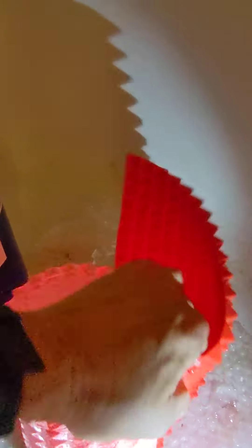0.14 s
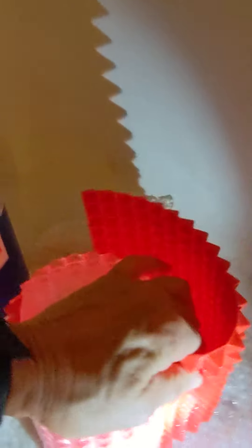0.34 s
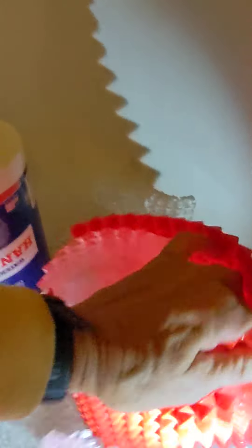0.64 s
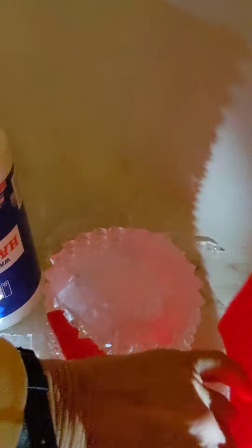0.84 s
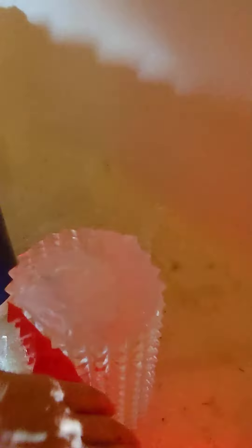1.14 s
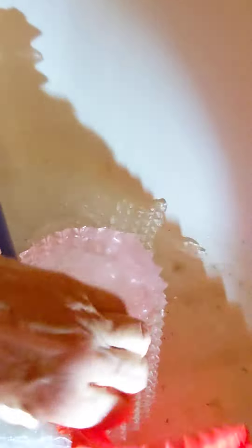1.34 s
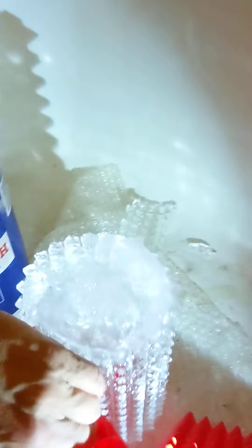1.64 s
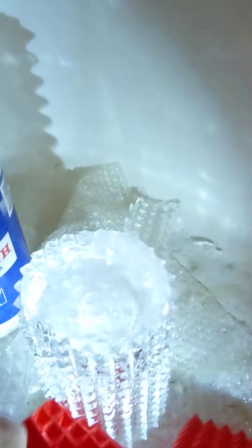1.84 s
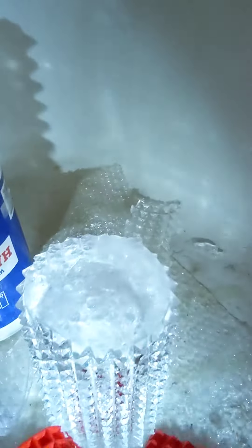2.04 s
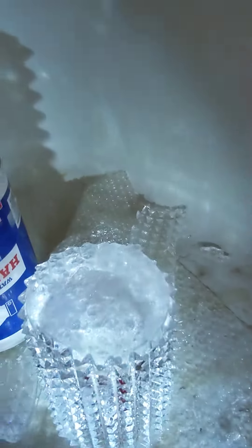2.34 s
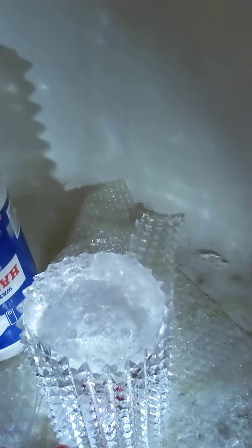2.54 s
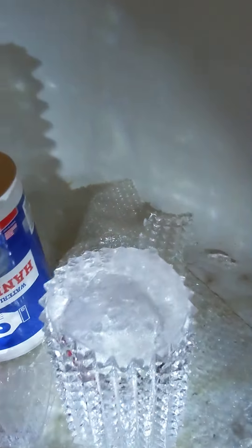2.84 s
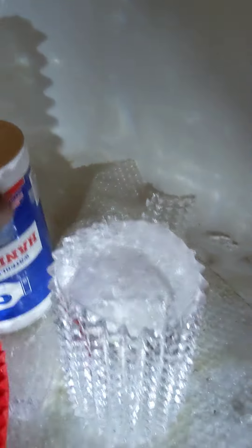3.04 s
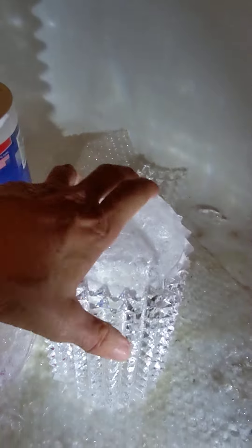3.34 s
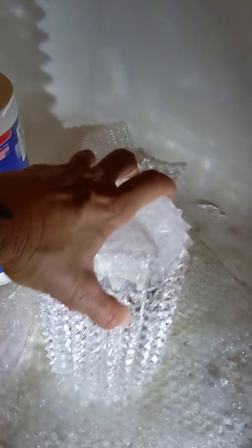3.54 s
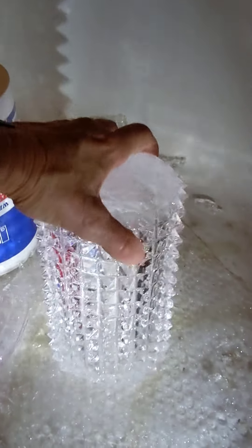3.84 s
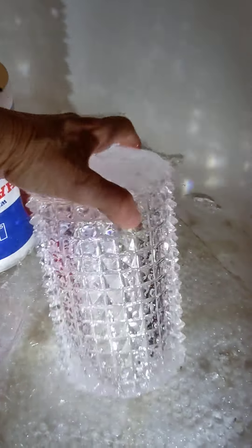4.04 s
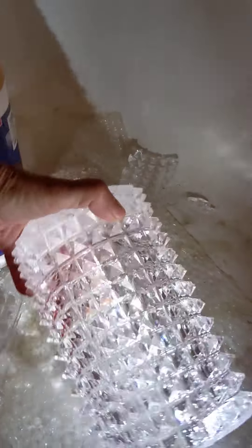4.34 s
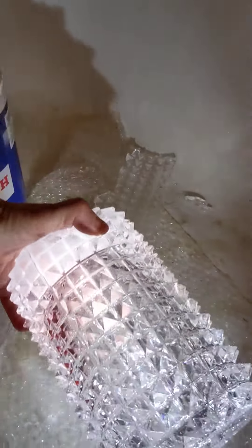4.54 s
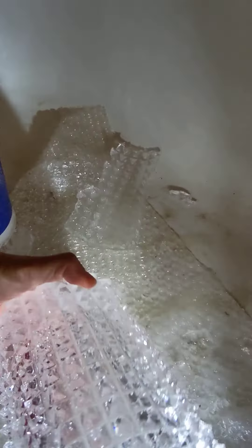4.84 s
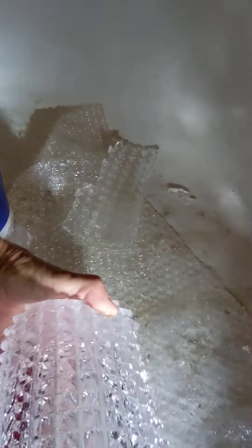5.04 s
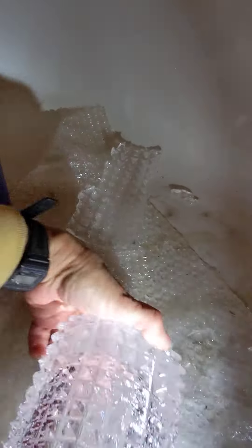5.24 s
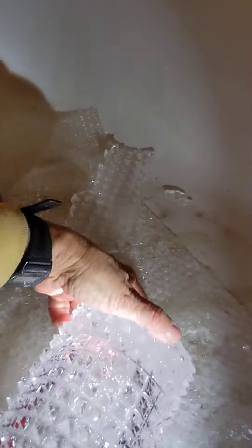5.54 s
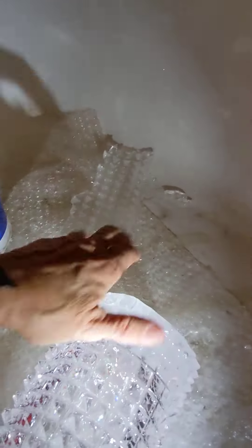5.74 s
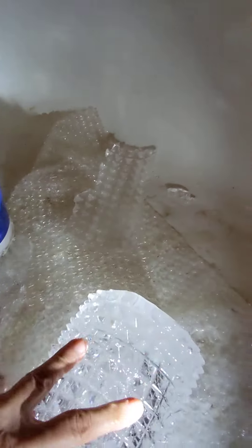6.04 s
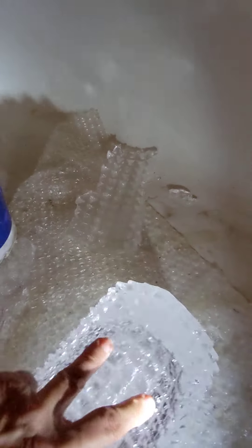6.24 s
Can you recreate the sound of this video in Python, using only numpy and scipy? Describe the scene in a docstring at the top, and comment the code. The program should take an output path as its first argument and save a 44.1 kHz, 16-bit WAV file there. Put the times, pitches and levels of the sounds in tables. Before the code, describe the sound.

Close up inside a small hard-walled freezer, a silicone mould is peeled from an ice block: dense crackling, sharp snaps, rubbery flaps and brief groans, with glassy ringing. The tearing stops after about three seconds. Fingertips tap the ice, it tips with faint ticks and rustling wrap, then lands and rolls with hollow bumps over a quiet rumble.

```python
"""A silicone mould is peeled off a tall block of ice that stands on bubble wrap in a chest freezer.
The mat crackles and snaps (showers of filtered clicks) and groans (wandering tones); the ice rings in its modes.
Then a hand tips the block and lays it down: it ticks, rustles the wrap and rolls with bumps on the hollow floor.
Noise echoes give the close hard walls, and shaped noise gives a quiet rumble."""
import sys
import numpy as np
from scipy import signal
from scipy.fft import rfft, irfft
from scipy.io import wavfile
from scipy.ndimage import uniform_filter1d

SR = 44100
rng = np.random.default_rng(int(sys.argv[2]) if len(sys.argv) > 2 else 0)


def digitize_waveform(pressure):
    """Quantize a signal to 16-bit integers and store it at the path in sys.argv[1].

    Rows of a 2-D input are taken as channels; values are limited to [-1, 1].
    """
    field = np.atleast_2d(pressure).T
    bounded = np.clip(field, -1, 1)
    quanta = np.round(bounded * 32767).astype(np.int16)
    wavfile.write(sys.argv[1], SR, quanta)


N = 281799
TIME = np.arange(N) / SR

# one stud or a whole row comes free: (t/s, snap level/dB, crack level/dB, release/s)
SNAPS = [(0.055, -30, -51, 0.0014), (0.3786, -28.5, -36.5, 0.0029), (0.3908, -25, -30, 0.0038),
         (0.5558, -34.5, -26.5, .002), (0.5908, -9.5, -10, 0.0021), (0.6762, -17.5, -30.5, .0025),
         (0.7500, -11, -24.5, 0.00094), (0.7688, -11.5, -9.5, 0.00067), (0.9005, -3, -19, .004),
         (0.912, -4, -27, 0.0027), (0.9200, -2.5, -17.5, .003), (1.0151, -24, -17, 0.0013),
         (1.0228, -13, -14.5, 0.00087), (1.0919, -25, -20, 0.0021), (1.1020, -19, -16.5, 0.0018),
         (1.135, -13.5, -21.5, .006), (1.149, -21, -21, 0.0011), (1.6398, -23.5, -19, 0.0025),
         (1.7752, -25, -26.5, 0.0018), (1.8137, -14, -17.5, .0035), (1.8322, -17.5, -27, 0.00076),
         (1.8485, -22.5, -22.5, .001), (1.8530, -4, -17.5, 0.0019), (1.909, -16.5, -10.5, 0.0019),
         (1.9335, -7.5, -18, 0.00092), (1.9738, -34, -27, 0.0002), (1.994, -21.5, -16.5, 0.0018),
         (2.0265, -17.5, -17.5, 0.0022), (2.0423, -23.5, -25.5, 0.00047), (2.0532, -25.5, -25.5, 0.00084),
         (2.0762, -14, -19, 0.0029), (2.0855, -17.5, -24, 0.0011), (2.0991, -17.5, -19, .001),
         (2.2212, -26.5, -28, .0005), (2.2415, -4.5, -17.5, .0016), (2.2701, -9, -26.5, 0.0021),
         (2.2813, -15, -26, 0.0012), (2.542, -44, -30, .001), (2.8632, -27, -29.5, 0.0017),
         (2.8907, -32, -20.5, 0.00095), (2.8952, -32.5, -20.5, 0.0021), (2.9168, -45, -19.5, 0.00039),
         (2.9239, -21, -21, 0.00098), (2.9536, -34, -20.5, 0.00075), (2.9737, -36, -22, 0.00072),
         (2.988, -33, -24, 0.00056), (3.0360, -25, -32, 0.00065), (3.0468, -21, -43, .002),
         (3.0610, -33, -44, 0.00067), (3.136, -30, -24.5, 0.0011), (3.1605, -30, -27.5, 0.00073),
         (3.1975, -28, -36, 0.0011), (3.3455, -59, -56, 0.0012)]
# the block rolls on its side: (t/s, push on the floor/dB)
ROLL = [(5.325, -30), (5.346, -30), (5.388, -36), (5.45, -27.5), (5.488, -22.5), (5.618, -24.5),
        (5.74, -35), (5.81, -53.5), (5.954, -56.5), (6.004, -58), (6.198, -44), (6.244, -35),
        (6.356, -43.5), (6.39, -34)]
# colour of the many small jumps of the mat: (f/Hz, level/dB)
CRACKLE_SPECTRUM = [(500, -21.5), (900, -3.5), (1200, -0.5), (1500, -4), (2300, 2.5), (3000, 0),
                    (3600, -7.5), (4700, -2.5), (5700, -17), (8000, -29.5)]
# colour of bright, sharp cracks: (f/Hz, level/dB)
CRACK_SPECTRUM = [(3000, -17), (4700, 4), (5900, -6), (7100, 0), (7900, -1), (9300, -3), (12000, -3),
                  (16000, -6)]
# colour of flexing rubber and of the crushed cushion: (f/Hz, level/dB)
FLEX_SPECTRUM = [(60, -17.5), (110, 2), (180, -15.5), (270, -16), (360, -7.5), (450, -8.5), (800, -11.5),
                 (1500, -17.5)]
# colour of rustling film and of ticking studs: (f/Hz, level/dB)
RUSTLE_SPECTRUM = [(400, -5.5), (1200, -1), (2900, 1.5), (4600, -0.5), (6000, -6), (10000, -6),
                   (16000, -10)]
PULL_ATTACK_S, PULL_RELEASE_DB_PER_S = 0.025, 296.5
SLAP_RELEASE_S = 0.007


def from_db(db):
    """Turn decibels into a gain."""
    return 10 ** (np.asarray(db) / 20)


def rms_one(x):
    """Scale a signal to an rms of 1."""
    return x / np.sqrt(np.mean(x ** 2) + 1e-20)


def at_hz(points, hz):
    """Read a table between its points, on a log-frequency axis."""
    f, value = np.transpose(points)
    return np.interp(np.log(hz), np.log(f), value)


def add(track, s, sound):
    """Mix a sound into a track at a time in seconds."""
    i = int(s * SR)
    track[i:i + len(sound)] += sound[:N - i]


def convolve(x, response):
    """Pass a signal through an impulse response."""
    return signal.fftconvolve(x, response, axes=-1)[..., :N]


def colour(x, spectrum, size=4096):
    """Filter to a spectrum, with unit energy and no pre-echo; it falls steeply past the table's ends."""
    hz = np.maximum(np.arange(size // 2 + 1) * SR / size, 1)
    octaves_outside = np.abs(np.log2(hz / np.clip(hz, spectrum[0][0], spectrum[-1][0])))
    gain = from_db(at_hz(spectrum, hz) - 20 * octaves_outside)
    # keeping one half of the cepstrum makes the filter respond as early as it can
    cepstrum = irfft(np.log(gain))
    response = irfft(np.exp(rfft(2 * cepstrum[:size // 2], size)))
    return convolve(x, response / np.linalg.norm(response))


def drift(per_s):
    """Wander slowly by chance, with an rms of 1; straight lines join so many random points per second."""
    knots = rng.standard_normal(4000)
    return rms_one(np.interp(TIME * per_s, np.arange(len(knots)), knots))


def stroke(start_s, length_s, attack_s, release_db_per_s, sag_db=0):
    """Gain of one movement: it rises, holds while sagging, and dies away."""
    age = TIME - start_s
    sag = sag_db * np.clip(age / length_s, 0, 1)
    release = release_db_per_s * np.maximum(age - length_s, 0)
    return np.clip(age / attack_s, 0, 1) * from_db(-sag - release)


def grains(per_s, spread_db, clump_db):
    """Tiny clicks of uneven size that come in clumps; the level is evened over 50 ms."""
    sizes = from_db(spread_db * np.minimum(rng.exponential(1, N), 4) + clump_db * drift(170))
    happens = rng.random(N) < per_s / SR
    clicks = sizes * rng.choice([-1, 1], N) * happens
    power = np.abs(uniform_filter1d(clicks ** 2, SR // 20))
    return clicks / np.sqrt(power + 1e-9)


def burst(release_s, size=1500):
    """One sharp break and a dying run of micro-clicks, with the energy of 10 ms at rms 1."""
    age = TIME[:size] / max(release_s, 1e-4)
    sizes = from_db(4.3 * np.clip(rng.standard_normal(size), -2, 2))
    run = rng.standard_normal(size) * sizes * np.sqrt(age) * np.exp(-2 * age)
    clicks = run / np.linalg.norm(run)
    clicks[np.argmin(np.abs(age - 0.5))] += rng.choice([-1, 1])   # the break
    return clicks / np.linalg.norm(clicks) * np.sqrt(SR / 100)


def push(contact_s):
    """Force of one cushioned contact, of unit impulse: it swells and dies, slower for a softer contact."""
    age = TIME[:SR // 20] / max(contact_s, 1e-4)
    force = age * np.exp(-5 * age)
    return force / force.sum()


def ring(force, hz, t60):
    """A resonance: a unit click sets a sine of starting height 1 ringing, 60 dB down after t60 seconds."""
    radius, angle = from_db(-60 / (t60 * SR)), 2 * np.pi * hz / SR
    feedback = [1, -2 * radius * np.cos(angle), radius * radius]
    return signal.lfilter([0, np.sin(angle)], feedback, force + 1e-18)


def strike(times, levels_db, modes):
    """Sharp blows set all modes of the ice ringing; every second mode starts downwards."""
    force = np.zeros(N)
    force[(times * SR).astype(int)] = from_db(levels_db)
    return sum(from_db(db) * ring(force, hz, t60) * (-1) ** k for k, (hz, db, t60) in enumerate(modes))


def groan(hz, wander_octaves=0.18):
    """A resonance of the stretched sheet wanders in pitch as the tension changes."""
    pitch = hz * 2 ** (wander_octaves * drift(24))
    return rms_one(drift(45) * np.sin(2 * np.pi * np.cumsum(pitch) / SR))


def diffuse_bands(size):
    """Half-octave bands of stereo noise whose left and right sides are alike by a share set per pitch."""
    # how alike left and right are: (f/Hz, likeness from 0 to 1)
    likeness = [(30, .4), (80, 1), (350, 0.14), (700, 0.76), (1200, 0.2), (2400, 0.06), (16000, 0.2)]
    edges = 22 * 2 ** (np.arange(20) / 2)
    white = rng.standard_normal((2, 2, size))
    for k, (low, high) in enumerate(zip(edges, edges[1:])):
        band = signal.butter(2, [low, high], "band", fs=SR, output="sos")
        mid, side = signal.sosfilt(band, white[k % 2])
        hz = np.sqrt(low * high)
        alike = np.clip(at_hz(likeness, hz), -1, 1)
        stereo = np.sqrt(1 + alike) * mid + np.sqrt(1 - alike) * side * [[1], [-1]]
        yield hz, stereo / np.sqrt(2)


def rumble():
    """A quiet rumble throughout: steady noise, strongest in the bass."""
    # colour of the rumble: (f/Hz, level/dB)
    spectrum = [(25, 1), (45, -6), (80, -0.5), (125, -22.5), (220, -21), (600, -33.5), (3000, -32.5),
                (7000, -38.5), (16000, -42.5)]
    noise_bands = diffuse_bands(N)
    return from_db(-57.5) * rms_one(sum(from_db(at_hz(spectrum, hz)) * noise for hz, noise in noise_bands))


def peeling():
    """Silicone tears loose from the ice in countless tiny jumps while the sheet flexes."""
    # each pull: (start t/s, length/s, crackle level/dB, slackening over the pull/dB,
    # fizz level against crackle/dB, flexing level/dB)
    pulls = [(-0.01, 0.14, -47, 14, 1, -62), (0.16, 0.85, -54.5, -3.5, -2, -65.5),
             (0.615, 0.76, -39.5, 10, 0, -48), (0.87, 0.35, -39, -1.5, -6.5, -54),
             (1.288, 0.21, -54.5, -7.5, -11.5, -51), (1.488, 0.24, -51.5, -6, -3.5, -55.5),
             (1.615, 0.11, -43, 0.5, 0, -48), (1.811, 0.12, -33.5, 4, 3.5, -39),
             (1.977, 0.7, -33, 9.5, -1, -45.5), (2.283, 0.64, -33, 14, 1, -43.5),
             (2.864, 0.12, -34, 2, 5, -42), (3.038, 0.14, -34, 8.5, -4.5, -42.5),
             (3.099, 0.19, -37.5, 10.5, 2, -46.5)]
    fizz_slackens, flex_slackens = 1.6, 0.23   # shares of the crackle's slackening in dB
    full_rip_db = 3.5   # fizz level near which a pull is a fast rip, whose jumps run together
    crackle, fizz, rip, flex = np.zeros((4, N))
    for s, length_s, db, sag_db, fizz_db, flex_db in pulls:
        pull = s, length_s, PULL_ATTACK_S, PULL_RELEASE_DB_PER_S
        bright = from_db(db + fizz_db) * stroke(*pull, fizz_slackens * sag_db)
        fast = np.clip(fizz_db / full_rip_db, 0, 0.9)
        # where pulls overlap, the louder one counts
        crackle = np.maximum(crackle, from_db(db) * stroke(*pull, sag_db))
        fizz = np.maximum(fizz, np.sqrt(1 - fast) * bright)
        rip = np.maximum(rip, np.sqrt(fast) * bright)
        flex = np.maximum(flex, from_db(flex_db) * stroke(*pull, flex_slackens * sag_db))
    jumps = grains(per_s=1100, spread_db=5.0, clump_db=4.0)
    run = grains(per_s=11000, spread_db=5.0, clump_db=6.5)
    rubber = grains(per_s=550, spread_db=7.0, clump_db=1.5)
    sheet = from_db(-4.0) * colour(rubber * flex, FLEX_SPECTRUM)
    sheet += from_db(-11.0) * flex * (groan(205) + groan(335))
    dull = from_db(-6.5) * colour(jumps * crackle, CRACKLE_SPECTRUM)
    sharp = from_db(-2.5) * colour(jumps * fizz + run * rip, CRACK_SPECTRUM)
    return dull + sharp + sheet


def snaps():
    """Studs come free with a snap, a bright crack and a flap of the sheet, which also slaps on its own."""
    # the loose sheet slaps: (t/s, level/dB)
    slaps = [(0.0572, -36.5), (0.385, -31), (0.775, -28), (0.922, -19.5), (0.948, -24), (1.1361, -31),
             (1.222, -42), (1.2893, -27), (1.39, -38.5), (1.4663, -37.5), (2.028, -27)]
    # colour of the flapping sheet: (f/Hz, level/dB)
    flap_spectrum = [(100, -13), (220, -14.5), (340, 2), (430, -6), (560, 3.5), (800, -9), (1200, -4),
                     (2000, -34.5)]
    flap, snap, crack = np.zeros((3, N))
    for s, db, crack_db, release_s in SNAPS:
        add(snap, s, from_db(db) * burst(release_s))
        add(crack, s, from_db(crack_db) * burst(release_s))
        add(flap, s, from_db(db - 24.5) * burst(SLAP_RELEASE_S))   # a little flap with every snap
    for s, db in slaps:
        add(flap, s, from_db(db) * burst(SLAP_RELEASE_S))
    snapping = from_db(-14.5) * colour(snap, CRACKLE_SPECTRUM)
    cracking = from_db(-8.5) * colour(crack, CRACK_SPECTRUM)
    return snapping + cracking + from_db(-3.0) * colour(flap, flap_spectrum)


def plucked_ice():
    """Every snap also sets the standing block ringing; the mat damps the ice less as it comes off."""
    # modes of the standing block: (f/Hz, level/dB, t60/s)
    upright_modes = [(1174, -5, .13), (1800, -11, .12), (2172, 6, .15), (2482, -4, .11), (2750, -1, .13),
                     (3133, -7, .12), (4115, -3, .12), (4420, -4, .13), (4815, 1, .15), (7125, -6, .14)]
    covered_db, bare_db, bare_at_s = -38, -20.5, 1.7   # ring level against the snap
    s, db = np.transpose(SNAPS)[:2]
    freedom_db = np.interp(s, [0, bare_at_s], [covered_db, bare_db])
    return strike(s, db + freedom_db, upright_modes)


def roll_push():
    """Gain of the rolling block's push on the floor; all but silent until it is laid down."""
    s, db = np.transpose(ROLL)
    return from_db(np.interp(TIME, s, db, left=-120))


def rolling_studs():
    """One stud after another meets the floor, at an uneven pace and with uneven softness."""
    studs_per_s, jitter, contact_s = 42, 0.247, 0.0047   # jitter as a share of the gap between studs
    force = np.zeros(N)
    times = np.arange(ROLL[0][0], ROLL[-1][0], 1 / studs_per_s)
    for s, (late, softness) in zip(times, rng.standard_normal((100, 2))):
        landing_s = min(s + jitter * late / studs_per_s, TIME[-1])
        add(force, landing_s, push(contact_s * 2 ** (0.31 * softness)))
    return from_db(6.5) * roll_push() * force


def floor_bumps():
    """Weight pushes on the hollow floor through the cushion; shorter pushes sound brighter."""
    # weight lands on the floor: (t/s, level/dB, contact time/s)
    bumps = [(0.395, -27, 0.012), (0.595, -23, 0.017), (0.914, -23, 0.00067), (3.271, -34.5, 0.0046),
             (3.712, -21, 0.015), (5.343, -29.5, 0.00018), (5.376, -15, 0.0046), (5.403, -18, 0.0083),
             (5.484, -13.5, 0.0037), (5.496, -17, 0.0055), (5.534, -9, 0.023), (5.599, -13.5, 0.0052),
             (5.621, -21, 0.0068), (5.675, -24, 0.0052), (5.724, -26.5, 0.0051), (5.754, -33.5, 0.0033),
             (6.007, -38, 0.0032), (6.380, -24, 0.0022)]
    # modes of the freezer floor: (f/Hz, level/dB, t60/s)
    floor_modes = [(79.4, -14.5, 0.4), (100, -4.5, 0.17), (154.3, -4.5, 0.4), (187, -7.5, 0.1),
                   (240, -4.5, 0.25), (286.7, -7.5, 0.35), (354, -9.5, 0.14), (430, -2.5, 0.14),
                   (497, -8, 0.3), (720, -3.5, 0.1)]
    force = rolling_studs()
    for s, db, contact_s in bumps:
        add(force, s, from_db(db) * push(contact_s))
    boom = np.zeros(N)
    for k, (hz, db, t60) in enumerate(floor_modes):
        # the point of contact moves, so each mode takes a changing share
        share = from_db(db - 2.0 + 2.5 * drift(50))
        boom += ring(force * share, hz, t60) * (-1) ** k
    # the cushion is crushed for a moment (12 ms decay) after each push, with a dull mutter
    crush = signal.lfilter([1], [1, -np.exp(-1 / (0.012 * SR))], force) * rng.standard_normal(N)
    dull = signal.butter(2, 260, fs=SR, output="sos")
    mutter = signal.sosfilt(dull, colour(crush, FLEX_SPECTRUM))
    no_deep_bass = signal.butter(5, 68, "high", fs=SR, output="sos")
    return signal.sosfilt(no_deep_bass, boom + from_db(-12.5) * mutter)


def straining():
    """The taut sheet groans higher and more steadily before it gives way."""
    # groans: (start t/s, length/s, level/dB)
    strains = [(0.688, 0.045, -41), (0.849, 0.13, -43)]
    tension = np.zeros(N)
    for s, length_s, db in strains:
        tension += from_db(db) * stroke(s, length_s, PULL_ATTACK_S, PULL_RELEASE_DB_PER_S)
    return tension * groan(553, wander_octaves=0.061)


def ice_blows():
    """Clean glassy knocks, then rough rings as studs skid and roll; a harder touch brings out overtones."""
    # the block knocks as it rocks: (t/s, level/dB, contact time/s)
    knocks = [(0.751, -17.5, 0.00022), (0.7698, -14.5, 0.000075), (0.784, -15, 0.0015)]
    # the handled block skids on its studs: (t/s, ring level/dB, overtones against ring/dB, skid time/s)
    taps = [(3.682, -48, 12.5, .0012), (3.701, -42, -7, .003), (3.905, -65, 10, 0.0038),
            (4.009, -65, 7, .002), (4.056, -54, 6, .003), (4.079, -51.5, 12.5, .003),
            (4.138, -52, 15.5, .006), (5.498, -19.5, -14, 0.013), (5.522, -21.5, -19, 0.0088),
            (5.647, -35.5, -28, 0.024), (6.007, -50, -14, 0.0085), (6.107, -53, -14.5, 0.0099),
            (6.261, -37.5, -14, 0.0023)]
    # modes of the knocked block: (f/Hz, level/dB, t60/s)
    knock_modes = [(1430, -11, .1), (1561, -1, .16), (2428, 3, .11), (3760, -1, .14)]
    # modes of the tipped block: (f/Hz, level/dB, t60/s)
    tipped_modes = [(1507, -2, .1), (1575, -6, .07), (2875, -3, .08), (4091, -15, .04), (4700, -11, .04),
                    (6971, -22, .04)]
    knock, soft, hard = np.zeros((3, N))
    for s, db, contact_s in knocks:
        add(knock, s, from_db(db) * push(contact_s))
    for s, db, overtones_db, skid_s in taps:
        skid = burst(skid_s, size=4000)
        skid *= from_db(db) / np.linalg.norm(skid)
        add(soft, s, skid)
        add(hard, s, skid * from_db(overtones_db))
    # the ice also skids under the rolling weight
    soft += from_db(-56.5) * roll_push() * grains(per_s=470, spread_db=-1, clump_db=1)
    rings = sum(from_db(db) * ring(knock, hz, t60) for hz, db, t60 in knock_modes)
    for k, (hz, db, t60) in enumerate(tipped_modes):
        force = soft if k < 2 else hard   # the two lowest modes, then the overtones
        rings += from_db(db) * ring(force, hz, t60)
    tick = from_db(6.5) * colour(hard, RUSTLE_SPECTRUM)   # the contact itself
    return rings + tick


def grip():
    """Fingertips land on the block with short knocks, damped by the hand."""
    # fingertips land: (t/s, level/dB)
    grips = [(3.2668, -22.5), (3.312, -44)]
    # modes under the hand: (f/Hz, level/dB, t60/s)
    grip_modes = [(850, -7, .008), (1336, 0, .011), (2525, -8, .014)]
    return strike(*np.transpose(grips), grip_modes)


def bubble_wrap():
    """The film rustles under the moving weight and now and then crinkles sharply."""
    # the tilting block shifts on the wrap: (start t/s, length/s, level/dB)
    shifts = [(3.655, 0.16, -59), (4.051, 0.2, -58.5), (5.036, 0.33, -56.5)]
    # the wrap crinkles: (t/s, level/dB, crack against that/dB)
    crinkles = [(3.46, -56, 4), (4.200, -56.5, 3.5), (5.07, -69, 18.5), (5.155, -52.5, -25),
                (5.34, -41, -0.5), (5.477, -32, -19), (5.519, -33, -22), (5.572, -60, -1),
                (6.009, -50.5, -6), (6.261, -47, 11)]
    load = from_db(-14.5) * roll_push()
    for s, length_s, db in shifts:
        load += from_db(db) * stroke(s, length_s, attack_s=0.012, release_db_per_s=216)
    film = from_db(-5.0) * load * grains(per_s=610, spread_db=-0.5, clump_db=6.5)
    crack = np.zeros(N)
    for s, db, crack_db in crinkles:
        fold = from_db(db) * burst(release_s=0.0051)
        add(film, s, fold)
        add(crack, s, fold * from_db(crack_db))
    return colour(film, RUSTLE_SPECTRUM) + colour(crack, CRACK_SPECTRUM)


def walls(tail_db):
    """Echoes from one spot: close walls scatter the sound, then a longer tail builds up and dies."""
    # how long the tail lasts: (f/Hz, t60/s)
    tail_t60 = [(200, 0.056), (550, 0.17), (1400, 0.14), (3700, 0.097), (10000, 0.099), (16000, 0.047)]
    early_db, early_t60 = -6, 0.007   # scatter from the nearest walls; t60 in seconds
    age = TIME[:SR // 3]
    early_onset = age > 0.0008
    tail_onset = 1 - np.exp(-(age / 0.005) ** 2)   # the far walls answer after a short gap
    response = np.zeros((2, len(age)))
    for hz, noise in diffuse_bands(len(age)):
        early = early_db, early_t60, early_onset
        tail = tail_db, at_hz(tail_t60, hz), tail_onset
        for db, t60, onset in (early, tail):
            fade = np.exp(-np.log(1000) * age / t60) * onset
            response += from_db(db) * noise * fade / np.linalg.norm(fade)
    return response


def direct(x):
    """Sound from the left reaches the right side 13 samples later."""
    return np.array([x, np.pad(x, (13, 0))[:N]])


def freezer(x, tail_db):
    """Direct sound plus echoes that change as the source moves between three spots."""
    shares = np.array([drift(40) for spot in range(3)])
    shares /= np.linalg.norm(shares, axis=0)
    echoes = sum(convolve(x[None] * share, walls(tail_db)) for share in shares)
    return direct(x) + echoes


def scene():
    """All sources inside the freezer, over a quiet rumble; the floor is heard without echoes."""
    crackling = freezer(peeling() + straining() + snaps() + bubble_wrap(), tail_db=0.36)
    ice = from_db(-2) * freezer(ice_blows() + plucked_ice() + grip(), tail_db=0.0)
    return crackling + ice + direct(floor_bumps()) + rumble()


def record(dry):
    """The right side is duller around 13 kHz; peaks stop at full scale and all above 16 kHz is cut."""
    b, a = signal.iirpeak(13000, 2, fs=SR)
    right = dry[1] - 0.42 * signal.lfilter(b, a, dry[1])
    stereo = np.clip([dry[0], from_db(0.6) * right], -1, 1)
    top_cut = signal.ellip(10, 0.2, 90, 16000, fs=SR, output="sos")
    return signal.sosfilt(top_cut, stereo)


dry = scene()
out = record(dry)
digitize_waveform(out)
```